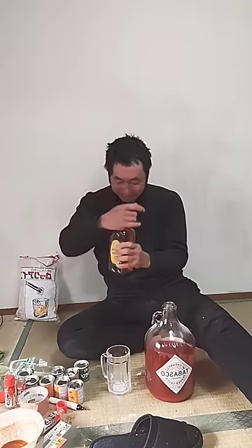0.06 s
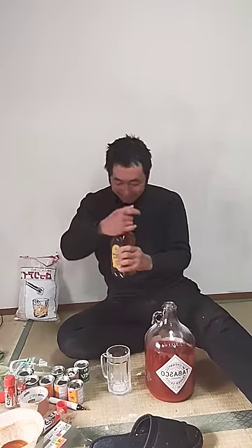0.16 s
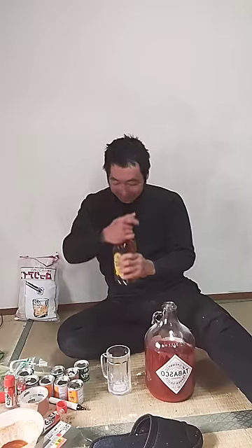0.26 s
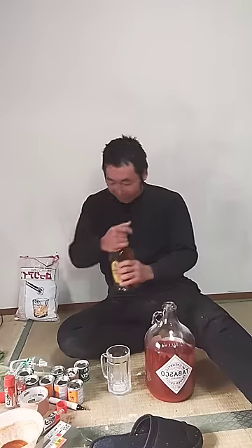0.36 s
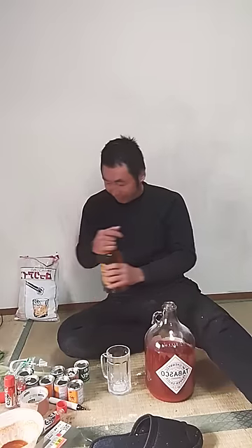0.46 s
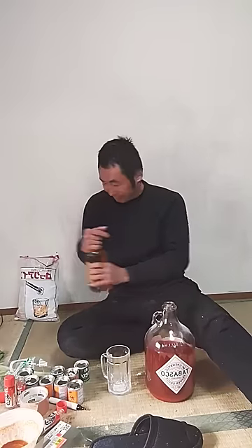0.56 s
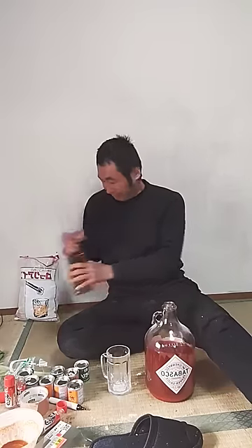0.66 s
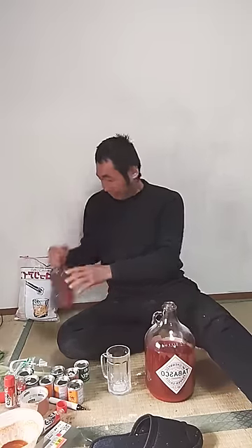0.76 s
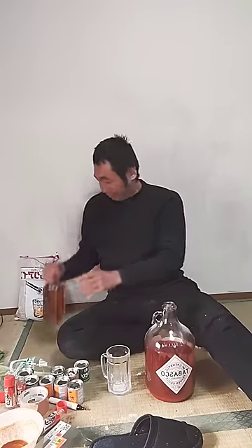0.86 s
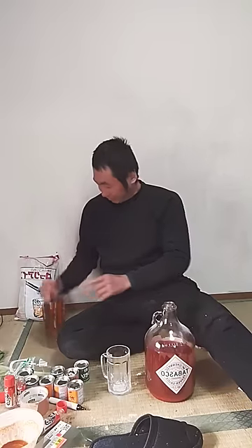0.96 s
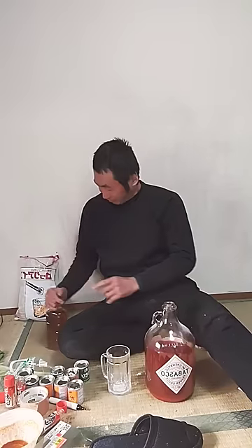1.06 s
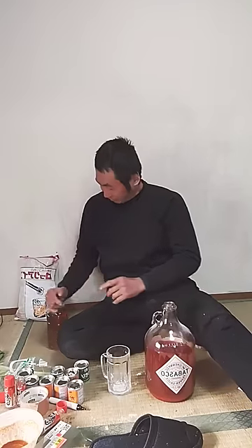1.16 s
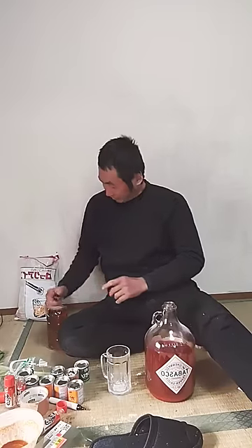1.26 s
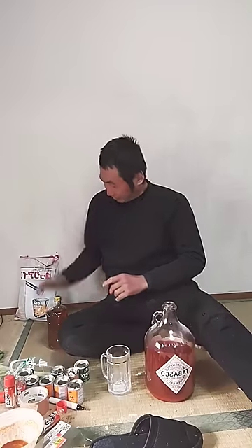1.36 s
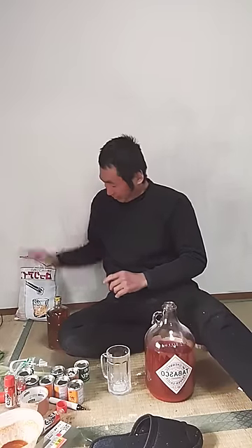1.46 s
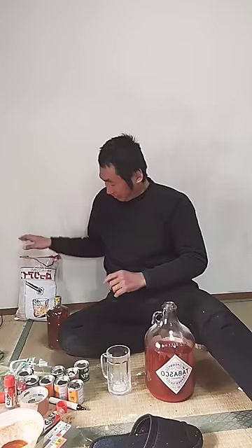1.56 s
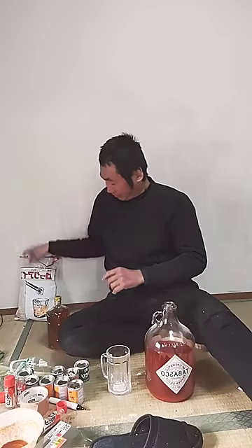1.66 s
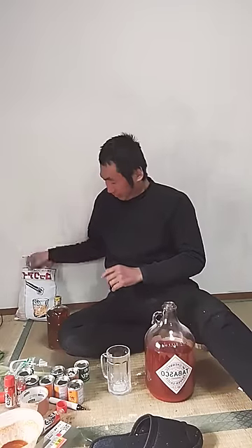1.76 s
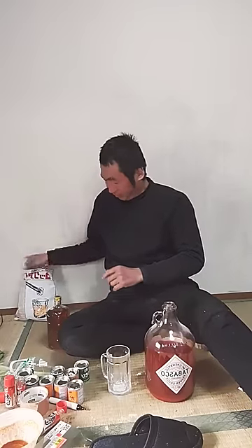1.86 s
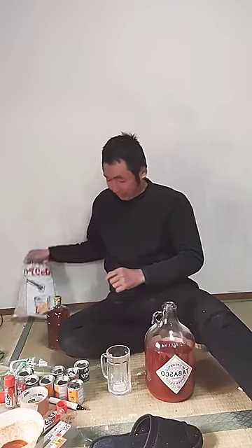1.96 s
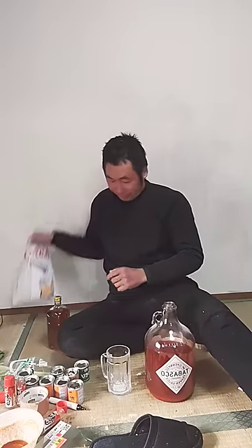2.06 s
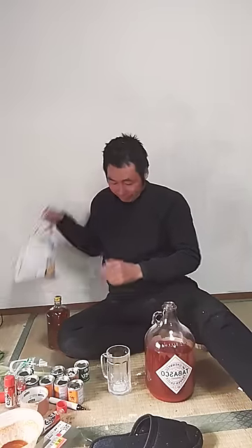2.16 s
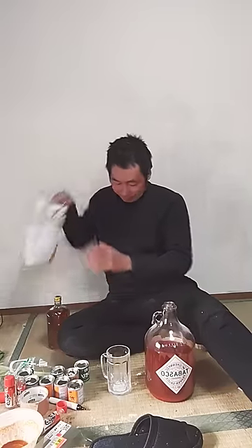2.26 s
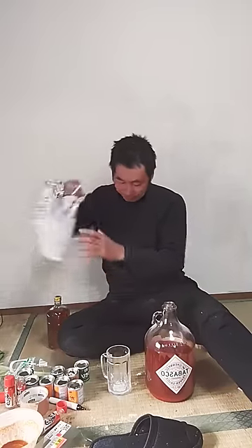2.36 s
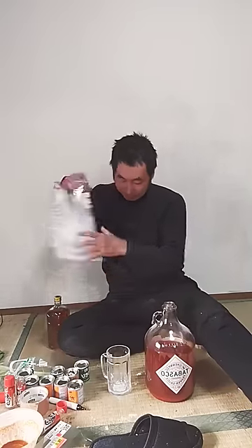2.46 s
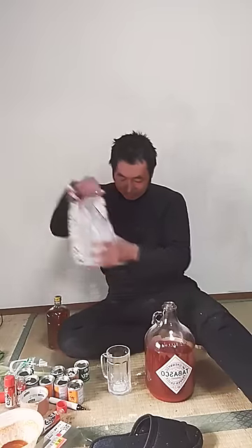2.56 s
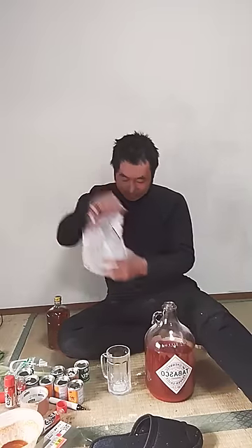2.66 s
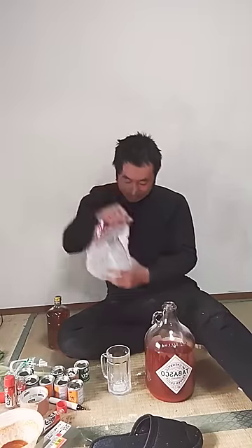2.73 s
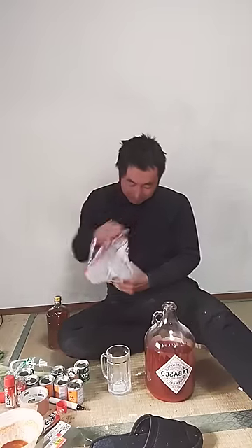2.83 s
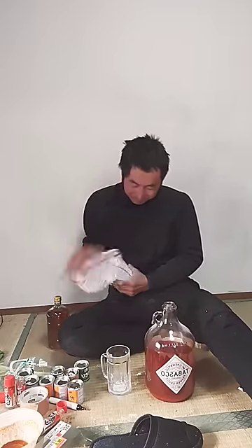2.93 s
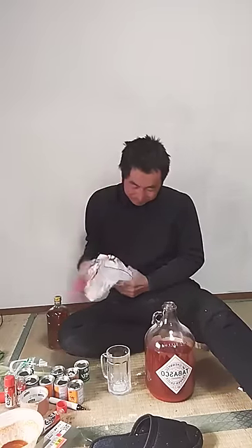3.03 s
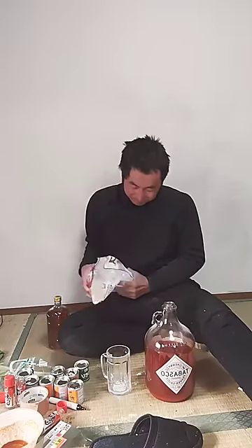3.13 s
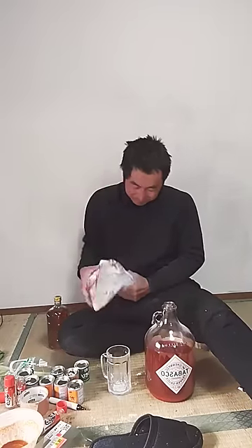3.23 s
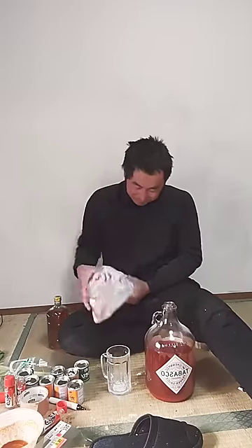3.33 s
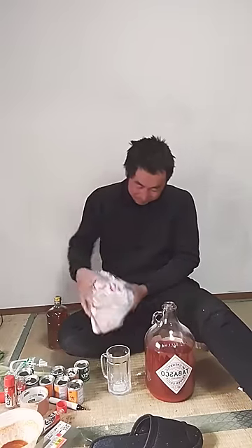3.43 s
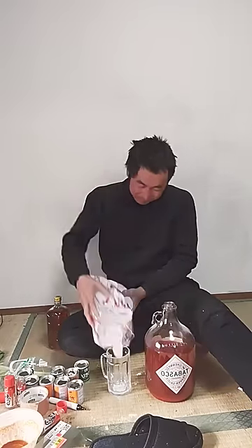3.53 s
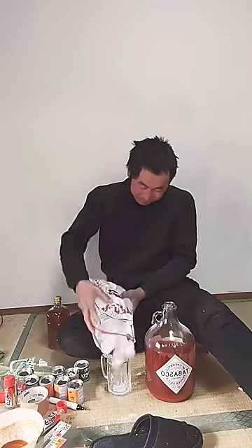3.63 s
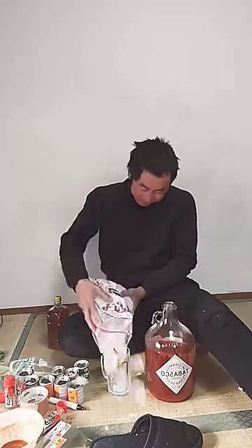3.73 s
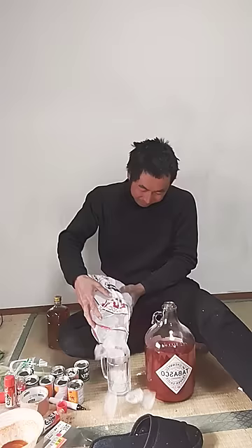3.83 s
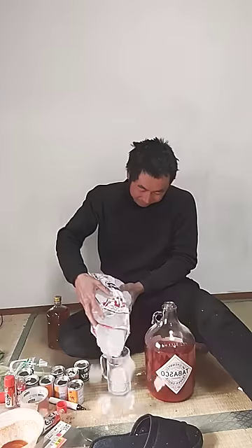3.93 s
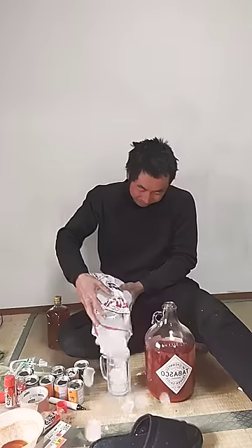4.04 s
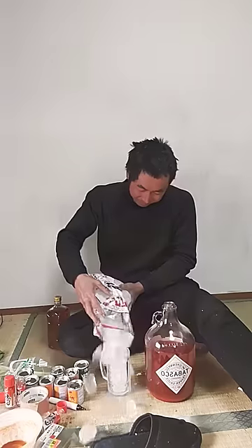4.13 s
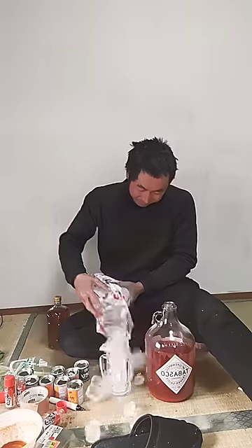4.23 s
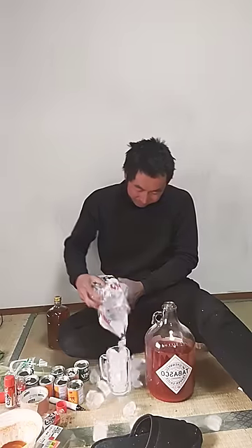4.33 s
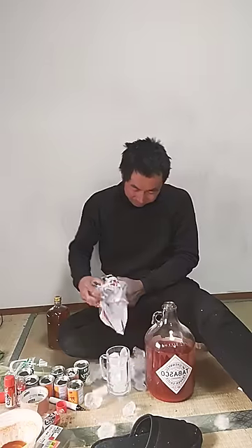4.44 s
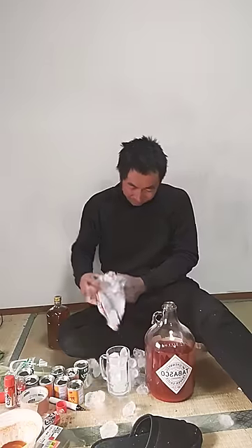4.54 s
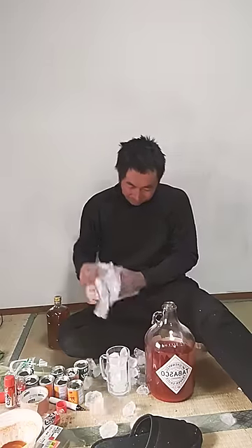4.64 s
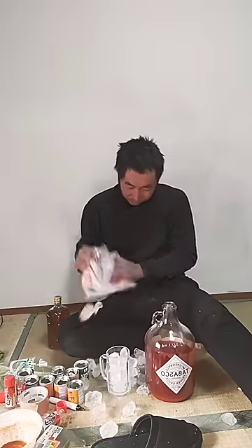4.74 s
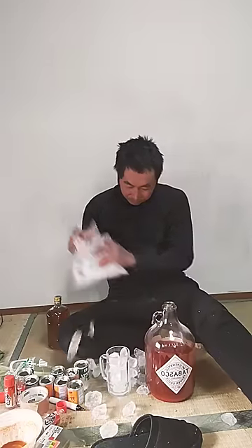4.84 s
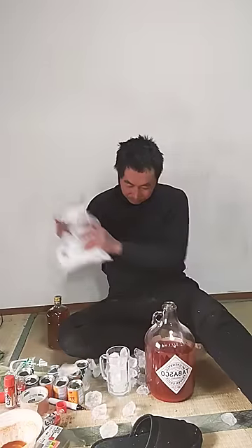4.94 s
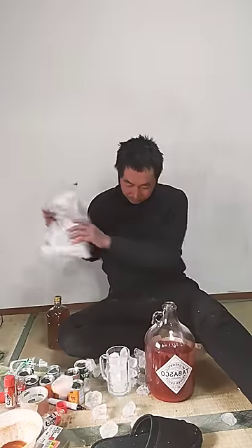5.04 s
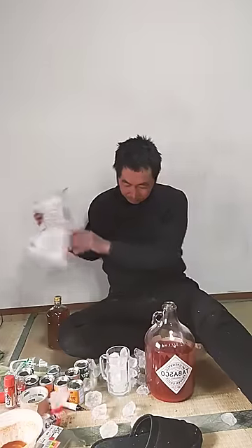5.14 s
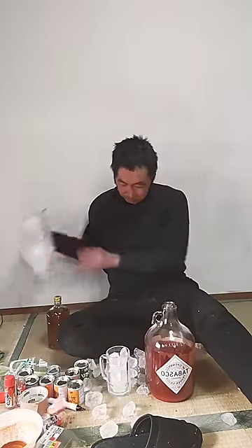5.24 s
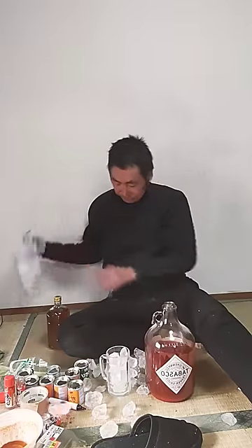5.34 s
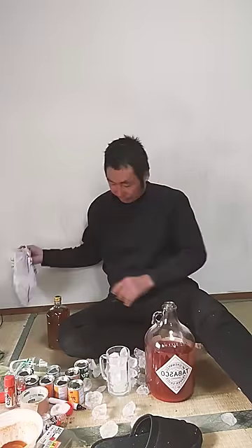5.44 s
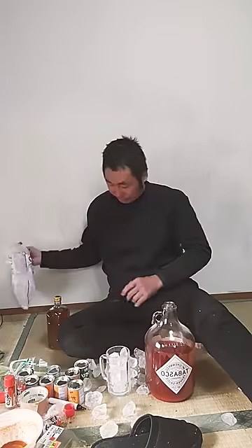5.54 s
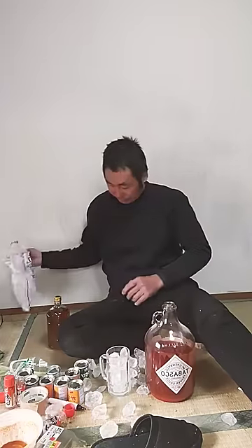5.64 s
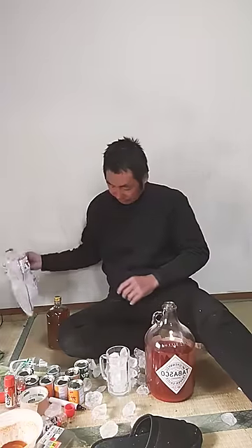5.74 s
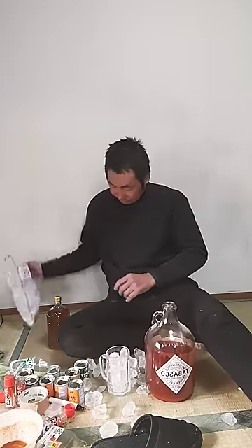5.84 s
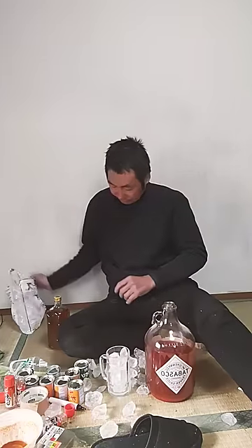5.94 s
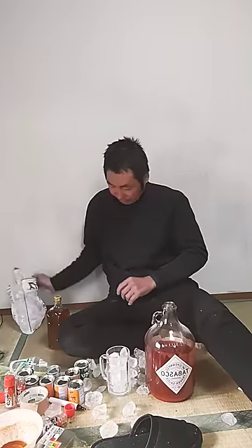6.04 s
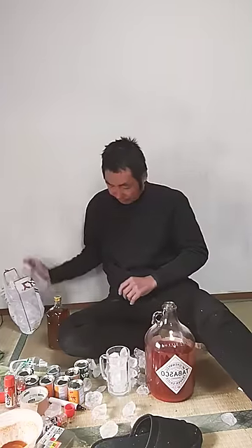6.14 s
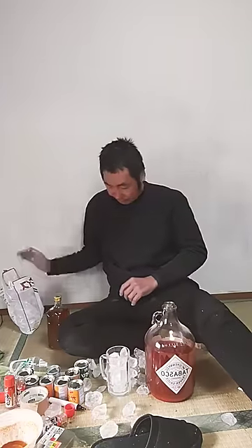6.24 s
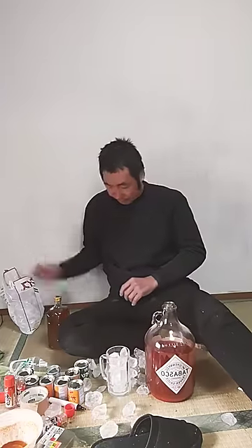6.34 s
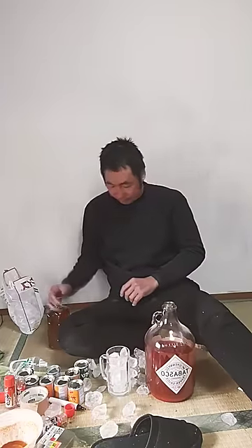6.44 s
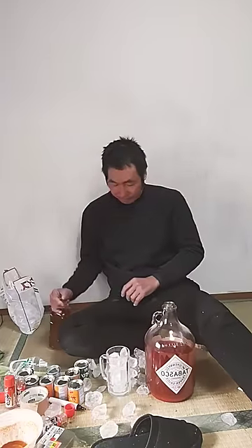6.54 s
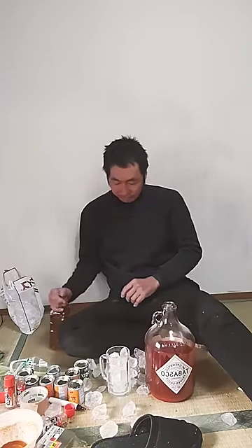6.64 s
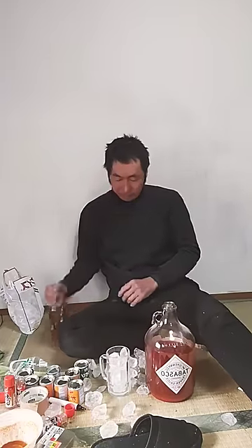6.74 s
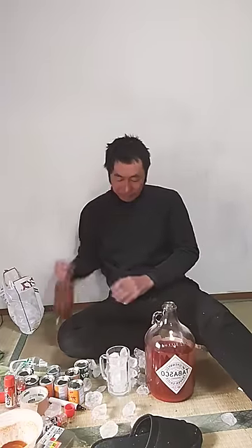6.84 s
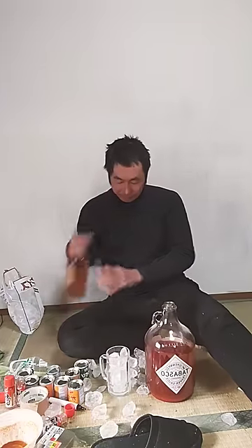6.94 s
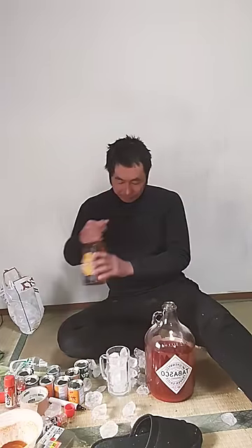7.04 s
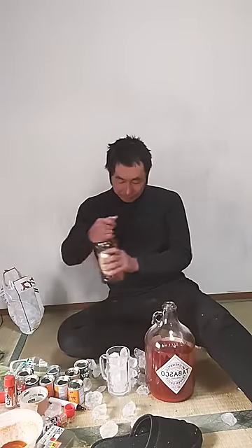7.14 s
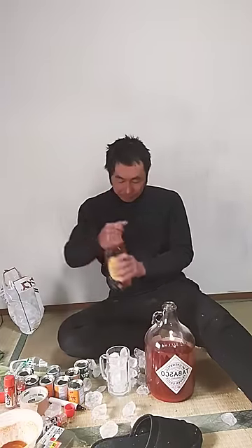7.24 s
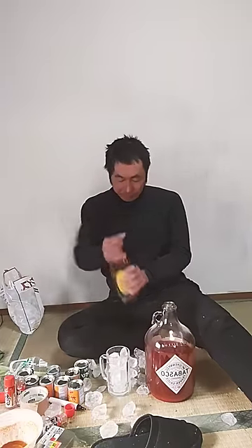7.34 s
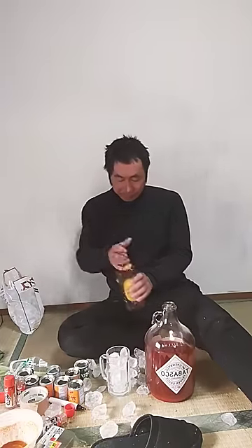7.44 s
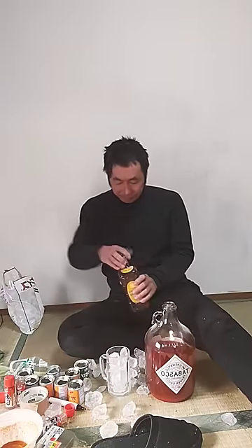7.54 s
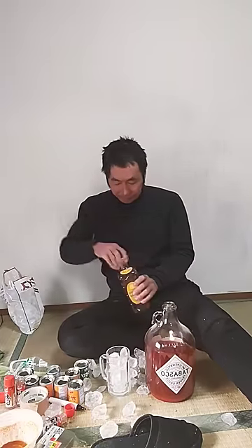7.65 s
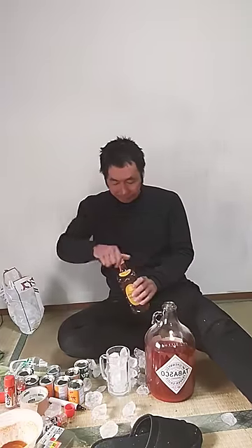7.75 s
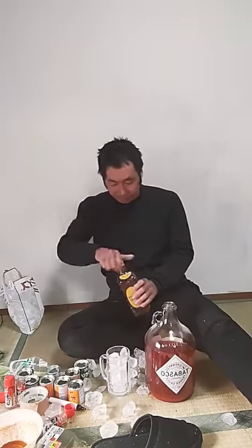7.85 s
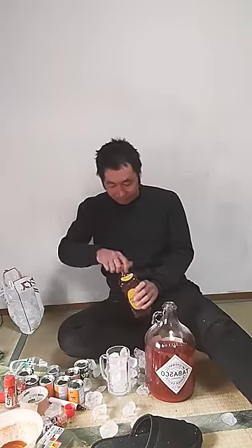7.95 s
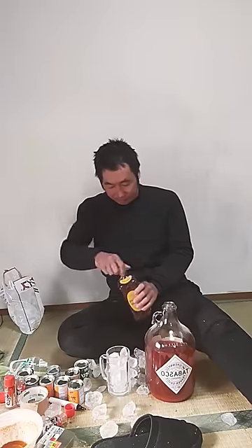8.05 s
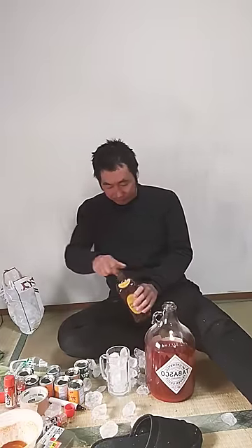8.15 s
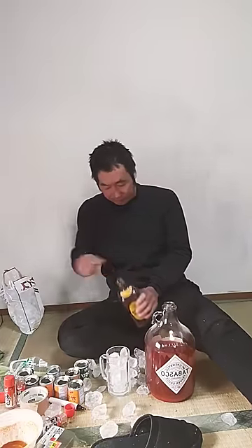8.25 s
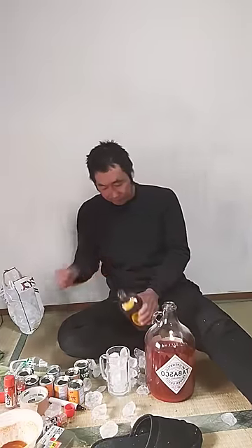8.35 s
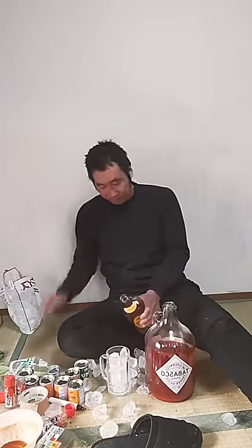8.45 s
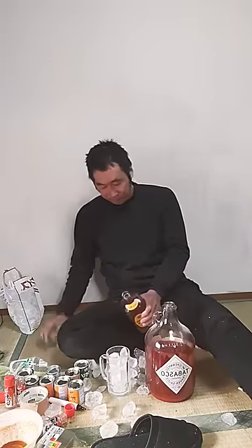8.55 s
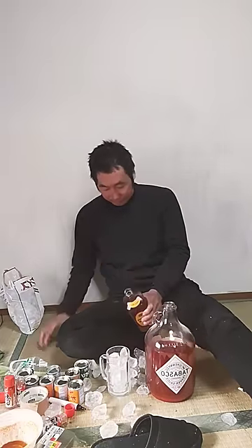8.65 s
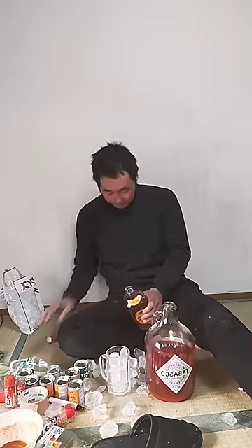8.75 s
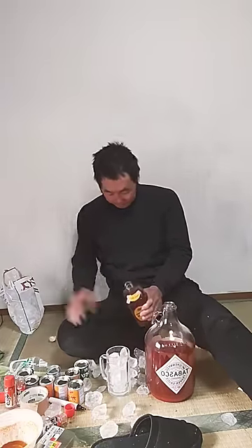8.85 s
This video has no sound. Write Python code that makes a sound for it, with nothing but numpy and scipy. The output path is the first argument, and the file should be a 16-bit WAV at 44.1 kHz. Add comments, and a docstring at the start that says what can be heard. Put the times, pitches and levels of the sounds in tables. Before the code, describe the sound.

Heavy bottle thud, crackling plastic, then a bright cascade of ice into a glass mug, loose cubes knocking, a bag drop and faint cap clicks.

```python
"""Ice cubes pour from a plastic bag, clink in a glass mug, strike a jug and thud on the mat of a small room.
Glass, ice, bottle, cap and other small hard things are banks of decaying modes with noise bursts at contact.
A bottle is set down first; the bag rustles as filtered clicks; at the end the bottle is opened, its cap dropped.
Thuds are damped sine cycles that set floor modes ringing; slow low rumble and a faint hiss swell and sink."""
import sys
import numpy as np
from scipy import signal
from scipy.fft import rfft, irfft
from scipy.io import wavfile
from scipy.ndimage import uniform_filter1d

SR = 44100
rng = np.random.default_rng(int(sys.argv[2]) if len(sys.argv) > 2 else 0)


def transcribe(signal):
    """Save signal, clipped to [-1, 1], as a 16-bit WAV file at the path in sys.argv[1]."""
    frames = np.atleast_2d(signal).T
    limited = np.clip(frames, -1, 1)
    pcm = np.round(limited * 32767).astype(np.int16)
    wavfile.write(sys.argv[1], SR, pcm)


def invert_db(x):
    """Field ratio 10**(x/20) for x, a level in decibels (scalar or array-like)."""
    u = np.asarray(x, float) / 20
    return 10 ** u


N = 392049
T = np.arange(N) / SR

# Swells of the background hiss and low rumble. Each row: peak in seconds, hiss level in dB,
# rise over 20 dB in seconds, fall over 20 dB in seconds (both at least 5 ms), relative rumble level in dB.
BACKGROUND_SWELLS = [(0.0, -68.5, 0, 0.43, -68.5), (0.31, -63.5, 0, 0.14, -52), (0.64, -69, 0, 0.6, -54),
                     (0.69, -61.5, 0, 0.14, -59), (0.93, -69, 0.26, 0.5, -54), (1.1, -78, 0, -2, -62),
                     (6.36, -68, 0, .5, -57), (6.558, -62.5, 0.34, 0, -46.5), (6.78, -63, 0.4, 0.74, -46.5),
                     (7.461, -52.5, 0.11, 0.2, -41.5), (7.54, -65.5, 0, 0.9, -49.5),
                     (8.105, -65, 0, 0.5, -54.5), (8.4, -68, 0.5, 0, -52), (8.88, -65.5, 0.92, 0.4, -48)]
# How thickly the ice pours. Each row: time in seconds, share of full flow.
POUR = [(3.55, 0.31), (3.8, 0.3), (4.2, 0.44), (4.42, 0.1), (4.5, 0.11)]


def colour(x, points):
    """Shape a signal by (Hz, dB) points; rms 1."""
    hz, db = np.transpose(points)
    f = np.maximum(np.fft.rfftfreq(len(x), 1 / SR), 1)
    gain = invert_db(np.interp(np.log(f), np.log(hz), db))
    y = irfft(rfft(x) * gain, len(x))
    return y / np.std(y)


def band(x, lo_hz, hi_hz, order=2):
    """Butterworth band-pass."""
    sos = signal.butter(order, [lo_hz, hi_hz], "band", fs=SR, output="sos")
    return signal.sosfilt(sos, x)


def curve(rows, column):
    """Gain of a dB column over time, silent outside its rows."""
    rows = np.array(rows)
    return invert_db(np.interp(T, rows[:, 0], rows[:, column], -200, -200))


def swells(rows, column):
    """Each swell climbs to its peak and dies away, straight in dB; powers add."""
    power = np.zeros(N)
    for row in rows:
        late_s = T - row[0]
        rise_s, fall_s = max(row[2], 0.005), max(row[3], 0.005)
        drop_db = 20 * np.where(late_s < 0, -late_s / rise_s, late_s / fall_s)
        power += invert_db(2 * (row[column] - drop_db))
    return np.sqrt(power)


def wander(rate_hz):
    """Random levels held for 1 / rate_hz seconds and slewed; spread near 1."""
    k = int(SR / rate_hz)
    held = rng.standard_normal(N // k + 1).repeat(k)[:N]
    return 1.44 * uniform_filter1d(held, k)


def clicks(rate_hz, spread_db):
    """Random clicks, many small and a few large; rms 1."""
    when = rng.random(N) < rate_hz / SR
    size = rng.standard_normal(N) * invert_db(spread_db * np.minimum(rng.exponential(size=N), 4))
    x = when * size
    return x / np.std(x)


def pour_flow():
    """Share of full ice flow over time, zero outside the pour."""
    return np.interp(T, *np.transpose(POUR), 0, 0)


def ring(modes, drive, flutter_db=0.):
    """Each decaying mode rings with its own row of drive; whatever touches the wall makes it flutter."""
    out = np.zeros(N)
    for (hz, db, t60_s), x in zip(modes, drive):
        pole = np.exp(2j * np.pi * hz / SR - np.log(1000) / (t60_s * SR))
        level = invert_db(db + flutter_db * wander(150))
        out += level * signal.lfilter([1], [1, -pole], x).imag
    return out


def struck(modes, hits, fall_db):
    """Each blow drives the mode nearest the struck spot by its lead; the others fade with distance in octaves."""
    hz = np.array(modes)[:, 0]
    drive = np.zeros((len(hz), N))
    chance_db = 3 * rng.standard_normal((len(hits), len(hz)))
    for (s, db, spot_hz, lead_db), scatter_db in zip(hits, chance_db):
        octaves = np.abs(np.log2(hz / spot_hz))
        share_db = np.where(octaves == octaves.min(), lead_db, scatter_db - fall_db * octaves)
        drive[:, int(s * SR)] += invert_db(db + share_db)
    return drive


def cracks(hits, decay_ms, lo_hz, hi_hz, order=1):
    """The contact itself: a sharp click and a short burst of noise, new for every blow."""
    out = np.zeros(N)
    t = np.arange(SR // 12) / SR
    for s, db, *_ in hits:
        burst = 0.72 * rng.standard_normal(len(t)) * np.exp(-t / (decay_ms / 1000)) * np.tanh(t / 0.00095)
        burst[0] = 0.3  # the click
        out[int(s * SR):][:len(t)] += invert_db(db) * burst
    return band(out, lo_hz, hi_hz, order=order)


def cube_rings(hits, t60_s, lo_hz, count):
    """Every cube has its own shape, so each blow adds a cluster of short rings at pitches of its own."""
    out = np.zeros(N)
    t = np.arange(SR // 8)[:, None] / SR
    for (s, db, *_), (where, size) in zip(hits, rng.random((len(hits), 2, count))):
        hz = lo_hz * (15000 / lo_hz) ** where
        rings = invert_db(-12 * size - 60 * t / t60_s) * np.sin(2 * np.pi * hz * t)
        out[int(s * SR):][:len(t)] += invert_db(db) * rings.sum(axis=1)
    return out


def hiss():
    """Smooth faint hiss over a steady floor, swelling and sinking."""
    # Spectrum of the hiss. Each row: frequency in Hz, relative density in dB per Hz.
    hiss_shape = [(180, -10.5), (300, -4.5), (1180, -8), (2400, -5), (5300, -5.5), (7500, -4),
                  (15500, -8.5)]
    steady_db = -92
    level = swells(BACKGROUND_SWELLS, column=1) + invert_db(steady_db)
    return level * colour(rng.standard_normal(N), hiss_shape)


def rumble():
    """Slow low rumble that swells and sinks, partly along with the hiss."""
    # Broad course of the rumble. Each row: time in seconds, relative level in dB.
    rumble_levels = [(1.03, -52), (1.06, -37), (1.62, -36), (2.507, -54), (3.512, -46.5), (3.629, -38.5),
                     (4.824, -54.5), (4.954, -46), (5.732, -44.5), (5.844, -51), (5.984, -38.5),
                     (6.213, -42.5), (6.34, -67)]
    shape = [(2, -11.5), (7, -7.5), (20, -19.5), (45, -29.5), (100, -41.5), (400, -72.0)]  # Hz, dB
    slow = colour(rng.standard_normal(N), shape)
    level = np.hypot(curve(rumble_levels, 1), swells(BACKGROUND_SWELLS, column=4))
    return invert_db(3.0) * slow * uniform_filter1d(level, size=SR // 25)  # level changes smoothed over 40 ms


def thuds():
    """Damped cycle or two from the mat, its straw crunching; the push sets the floor boards ringing."""
    # Landings on the mat. Each row: start in seconds, relative level in dB, thud frequency in Hz,
    # floor push over the thud in dB.
    landings = [(1.035, -14, 125, -1), (1.058, -23.5, 90.5, 8.5), (1.072, -22, 87, 2.5),
                (1.515, -40.5, 132, 0), (1.923, -32, 195, -21), (2.922, -34.5, 125, -7),
                (3.599, -31, 121, -5.5), (3.665, -23, 260, -15), (3.787, -18.5, 328, -15.5),
                (3.853, -18, 356, -17.5), (3.868, -17, 180, -15), (3.999, -15.5, 208, -15),
                (4.048, -22.5, 354, -14.5), (4.154, -19, 188, -13), (4.274, -22.5, 198, -16.5),
                (4.3, -18, 236, -15.5), (4.473, -23, 199, -10), (4.969, -24.5, 233, -11),
                (5.022, -29, 167, -16), (5.198, -29.5, 210, -15), (5.525, -33.5, 162, -9),
                (5.915, -19, 158, -3.5), (6.989, -56, 334, -24.5), (8.617, -50, 162, 5.5),
                (8.649, -44, 300, -22)]
    # Modes of the floor boards. Each row: frequency in Hz, relative level in dB, T60 in seconds.
    floor_modes = [(22.3, -14.5, 0.94), (42.6, -5.5, 0.6), (58, -10, 0.38), (74.7, -3.5, 0.49),
                   (99.3, -3, 0.53), (188, -19.5, 0.16)]
    mat, push = np.zeros(N), np.zeros(N)
    t = np.arange(SR // 10) / SR
    for s, db, hz, floor_db in landings:
        i = int(s * SR)
        cycles = t * hz
        envelope = 3.2 * cycles * np.exp(-cycles / 0.58)
        mat[i:i + len(t)] -= invert_db(db) * np.sin(2 * np.pi * cycles) * envelope
        push[i] -= invert_db(db + floor_db)
    boards = ring(floor_modes, [push] * len(floor_modes))
    straw = invert_db(-11.5) * cracks(landings, 18.0, 400, 4500)
    return mat, boards, straw


def bottle():
    """Blows ring the bottle's modes, each with a contact burst."""
    # Modes of the bottle. Each row: frequency in Hz, relative level in dB, T60 in seconds.
    bottle_modes = [(903, -7.5, 0.41), (2200, -1, 0.15), (2490, -1.5, 0.19), (3660, -4, 0.13),
                    (3900, 1, 0.098)]
    # Blows. Each row: start in seconds, relative level in dB, struck spot in Hz, lead of its mode in dB.
    bottle_hits = [(1.394, -58, 3660, 4.1), (7.316, -76, 3900, 13.5), (7.5, -69.5, 2190, 10.2),
                   (8.0955, -65, 3660, 2), (8.1294, -70, 2200, 9.3)]
    body = ring(bottle_modes, struck(bottle_modes, bottle_hits, fall_db=1.5), flutter_db=5.5)
    return invert_db(-2.0) * body + cracks(bottle_hits, 6.0, 900, 9000)


def bag():
    """Creases of thin plastic pop open densely and in clusters; the cubes inside knock dully."""
    # Broad rise and fall of the rustle. Each row: time in seconds, level in dB.
    rustle_levels = [(1.6, -73), (1.69, -67.5), (1.74, -52), (2.08, -52.5), (2.46, -44.5), (2.7, -34.5),
                     (3.07, -42.5), (3.33, -36), (3.42, -32.5), (3.72, -37), (3.85, -31), (4.42, -35.5),
                     (4.55, -43), (4.9, -46), (5.25, -41.5), (5.88, -42.5), (6.22, -52), (6.29, -115)]
    # Spectrum of the crinkle. Each row: frequency in Hz, relative density in dB per Hz.
    crinkle_shape = [(590, -22), (1000, -7), (1240, -1.5), (4650, 3.5), (5520, -2), (7030, 4.5),
                     (9150, -1.5), (14800, 2), (15500, -0.5)]
    # Single squeezes, tugs and drops. Each row: peak in seconds, level in dB, rise over 20 dB in seconds,
    # fall over 20 dB in seconds (both at least 5 ms).
    squeezes = [(1.93, -28, 0.1232, 0.15), (2.19, -40, 0.13, 0), (2.362, -43, 0, 0.4),
                (2.518, -24.5, 0.0281, 0.44), (2.82, -27, 0.0963, 0.42), (2.998, -26, 0.2535, 0.15),
                (3.3, -37.5, 0.1, 0.55), (3.562, -27, 0.2731, 0), (4.168, -24, 0.38, 0.19),
                (4.313, -22.5, 0.17, 0.2137), (4.487, -29.5, 0, 0.1863), (4.687, -34.5, 0.3, 0.09),
                (5.14, -34, 0.6, 0.2453), (5.413, -32.5, 0.36, 0.09), (5.928, -17, 0.0383, 0.1022),
                (6.126, -36, 0, 0.11)]
    # How loosely the ice lies. Each row: time in seconds, knocking level against the crinkle in dB.
    loose_ice = [(1.6, 4), (1.95, -13), (2.55, -16), (4.3, -22.5), (4.9, -12), (5.7, -13), (6.2, -12.5)]
    # Snaps of the creases. Each row: start in seconds, relative level in dB.
    snaps = [(1.8173, -17), (1.8796, -11.5), (1.9121, -19), (2.1395, -26.5), (2.2752, -13), (2.3565, -17.5),
             (2.5037, -7), (2.6509, -16), (2.8858, -9.5), (2.974, -9), (3.001, -11.5), (3.0859, -12.5),
             (3.3593, -11.5), (4.4864, -13.5), (4.5421, -18), (4.563, -13.5), (5.0828, -15.5), (5.121, -20),
             (5.2599, -15), (5.5478, -16.5), (5.6077, -19), (5.838, -24.5), (6.123, -11), (6.355, -41), ]
    pops = invert_db(1.5 * wander(70)) * clicks(7000, 1.9) + 0.45 * clicks(220, 2.0)
    film = colour(pops, crinkle_shape)
    dull = band(film, 300, 7400)
    bright = film - dull
    film = invert_db(1.3 * wander(25)) * dull + invert_db(1.3 * wander(25)) * bright  # each wavers by itself
    cubes = band(clicks(900, 3.0), 90, 1300)
    cubes /= np.std(cubes)
    handling = np.hypot(curve(rustle_levels, 1), swells(squeezes, column=1))
    rustle = handling * (film + curve(loose_ice, 1) * cubes)
    return rustle + invert_db(0.76) * cracks(snaps, 1.78, 2800, 18000)


def ice():
    """Struck cubes ring briefly at shared modes and at pitches of their own, with a bright crack."""
    # Modes of the ice. Each row: frequency in Hz, relative level in dB, T60 in seconds.
    ice_modes = [(760, -15, .06), (1001, -13.5, 0.1), (1400, -17, .05), (1600, -18.5, 0.067),
                 (2300, -11.5, 0.025), (4150, -13, .03), (4985, -13, 0.065), (5410, -12.5, .03),
                 (6584, -13.5, 0.07), (7150, -14, 0.08), (9400, -13, 0.032), (11000, -12, 0.11)]
    # Blows. Each row: start in seconds, relative level in dB, struck spot in Hz, lead of its mode in dB.
    ice_hits = [(2.195, -42.5, 1001, 13), (2.527, -36, 760, 20), (3.735, -22.5, 1600, 18.3),
                (3.761, -30, 1600, 16), (3.8, -30.5, 1600, 15), (4.036, -26, 1400, 17),
                (4.913, -5, 5410, 6), (4.918, -6.5, 4985, 7), (5.018, -14.5, 7150, 5),
                (5.019, -22, 1600, 17), (5.049, -28, 6584, 19), (5.020, -26, 1001, 17),
                (5.127, -19, 2300, 14), (5.345, -32, 1001, 19), (5.703, -36.5, 4985, 18)]
    body = ring(ice_modes, struck(ice_modes, ice_hits, fall_db=8.0), flutter_db=5.5)
    contact = cracks(ice_hits, 9.4, 5000, 19845)
    cubes = cube_rings(ice_hits, 0.13, 4000, count=24)
    return invert_db(-3.5) * body + invert_db(2.5) * contact + invert_db(-16) * cubes


def knocks():
    """Dull knocks of cube on cube: short noise bursts."""
    # Knocks. Each row: start in seconds, relative level in dB.
    knock_hits = [(2.921, -13), (3.664, -17.5), (3.700, -17.5), (4.101, -14), (4.221, -14), (4.916, -7),
                  (4.968, -14.5), (5.049, -17), (5.200, -16.5)]
    return cracks(knock_hits, 2.5, 980, 4000, order=2)


def mug():
    """Single blows, and while the ice pours a rattle of small cubes, ring the mug's modes."""
    # Mode frequencies of the mug in Hz.
    mug_hz = [605, 2222, 2346, 3170, 3271, 4120, 4639, 5715, 6292, 6612, 6906, 7545, 9128, 10390, 11118,
              11925, 13070, 14085, 14680]
    # The modes in that order. Each row: relative level in dB, T60 in seconds.
    mug_ring = [(-17.5, .061), (-14.5, 0.37), (-6.5, .15), (-18, .15), (-14, 0.16), (-21, 0.076),
                (-14.5, 0.11), (-15, .13), (-12, 0.091), (-10.5, .1), (-12, 0.14), (-15, 0.19), (-9, 0.072),
                (-17.5, 0.092), (-14.5, 0.15), (-17, .1), (-14, 0.12), (-18, .09), (-12, 0.097)]
    # Blows. Each row: start in seconds, relative level in dB, struck spot in Hz, lead of its mode in dB.
    mug_hits = [(3.5561, -2, 9110, 7), (3.558, -11, 2345, 12), (3.6404, -19.5, 6230, 9),
                (3.7, -22, 2343, 11), (3.7333, -13, 14640, 9), (3.735, -18, 603.5, 17.5),
                (3.7594, -15, 10420, 14.5), (3.7999, -7, 9150, 9), (3.82, -14.5, 6603, 12),
                (3.8709, -6.5, 3265, 5.5), (3.9388, -8.5, 3260, 9), (4.0206, -10, 2330, 4),
                (4.0856, -7, 4650, 17), (4.1044, -11, 2244, 10.5), (4.1454, -7, 11140, 9),
                (4.146, -15, 5726, 14.5), (4.164, -8, 6650, 9.5), (4.1723, -3.5, 6650, 14.5),
                (4.2207, -11.5, 2346, 8.5), (4.2494, -11.5, 6310, 7), (4.2794, -12.5, 6225, 13.5),
                (4.29, -10.5, 14650, 10.5), (4.3088, -9.5, 6320, 15.5), (4.366, -6.5, 6860, 16.5),
                (4.398, -18, 2217, 23.5), (4.4262, -3.5, 11118, 14)]
    full_s, full_db, wall_hz = 4.24, -8, 3400  # once full, modes below wall_hz are driven less
    modes = [(hz, *row) for hz, row in zip(mug_hz, mug_ring)]
    spots = invert_db(4.0 * rng.standard_normal((len(modes), N // 256 + 1))).repeat(256, axis=1)[:, :N]
    rattle = invert_db(-37.5) * pour_flow() * clicks(260, 1.1) * spots
    packed = np.outer(np.array(mug_hz) < wall_hz, T > full_s)  # ice wedged against the wall holds its low modes
    drive = invert_db(full_db * packed) * (struck(modes, mug_hits, fall_db=3.0) + rattle)
    body = ring(modes, drive, flutter_db=2.07)
    contact = cracks(mug_hits, 2.4, 2500, 16000, order=2)
    cubes = cube_rings(mug_hits, 0.05, 1200, count=14)
    return invert_db(-9.5) * body + invert_db(-13.5) * contact + invert_db(-30.5) * cubes


def tumble():
    """Many small cubes miss the mug and bump on the mat while the ice pours."""
    bumps = band(clicks(90, 3.8), 81, 520)
    return invert_db(-38.0) * np.sqrt(pour_flow()) * bumps / np.std(bumps)


def jug():
    """Cubes strike the jug and ring its modes."""
    # Modes of the jug. Each row: frequency in Hz, relative level in dB, T60 in seconds.
    jug_modes = [(1324, -14, 0.58), (1497, -15, 0.99), (1610, -12, 0.9), (3230, -12.5, 0.22),
                 (3408, -4.5, 0.42), (3507, -8, 0.35), (3640, -10.5, .25), (3880, -13, 0.18),
                 (5033, -6, 0.16)]
    # Blows. Each row: start in seconds, relative level in dB, struck spot in Hz, lead of its mode in dB.
    jug_hits = [(4.25, -18, 3507, 3.3), (4.288, -10.5, 5033, 5.6), (4.309, -9, 3408, 4.4),
                (4.311, -23, 1610, 5), (4.322, -16, 1324, 8)]
    return invert_db(-9.5) * ring(jug_modes, struck(jug_modes, jug_hits, fall_db=8.0), flutter_db=2.5)


def clacks():
    """Short ringing clacks and ticks of the cap and other small hard things: modes, dull and bright bursts."""
    # Modes of these things. Each row: frequency in Hz, relative level in dB, T60 in seconds.
    clack_modes = [(3180, -8, 0.037), (3480, -5.5, 0.03), (5300, -7, 0.043), (6067, -11, 0.055),
                   (10250, -12.5, 0.15), (12450, -9, 0.12), (14450, -10, 0.069)]
    # Clacks and ticks. Each row: start in seconds, relative level in dB, favoured frequency in Hz,
    # lead of its mode in dB.
    clack_hits = [(7.69, -59, 3550, 12), (7.911, -53, 5300, 12), (8.617, -44, 3180, 4),
                  (8.634, -48.5, 3550, 12.5), (8.647, -43, 6067, 12), (8.660, -53, 3180, 10.5),
                  (8.672, -54, 3480, 11), (8.727, -48.5, 10250, 14), (8.728, -49, 14450, 16),
                  (8.730, -55.5, 12450, 19), (8.798, -55, 14450, 0), (8.803, -53.5, 14450, 0)]
    body = ring(clack_modes, struck(clack_modes, clack_hits, fall_db=10.5), flutter_db=5.5)
    dull = cracks(clack_hits, 12, 200, 3500)
    bright = cracks(clack_hits, 1.5, 3000, 16000)
    return invert_db(-3.5) * body + invert_db(4.5) * dull + invert_db(3.0) * bright


def room(x):
    """Dense reflections of a small bare room, the treble fading faster."""
    t60_s, treble_t60_s, room_db = 0.47, 0.25, -7.5
    t = np.arange(SR // 2) / SR
    noise = rng.standard_normal(len(t))
    low = band(noise, 17, 2000)
    tail = low * invert_db(-60 * t / t60_s) + (noise - low) * invert_db(-60 * t / treble_t60_s)
    tail *= np.clip(t / 0.0013 - 1, 0, 1)  # nothing returns before the nearest wall
    tail /= np.sqrt(np.sum(tail ** 2))
    return x + invert_db(room_db) * signal.fftconvolve(x, tail)[:N]


def scene():
    """Everything airborne passes through the room; mat and floor also reach the microphone through its stand."""
    mat, boards, straw = thuds()
    struck_things = bottle() + ice() + knocks() + mug() + jug() + clacks()
    air = room(struck_things + bag() + invert_db(2.0) * mat + straw + tumble())
    stand = invert_db(-14.5) * mat + boards
    return (air + stand + rumble() + hiss())[None]


def roll_off(x):
    """The treble ends steeply here."""
    return signal.sosfilt(signal.butter(12, 15500, fs=SR, output="sos"), x)


def record(dry):
    """Peaks are clipped at full scale."""
    mix = np.clip(dry, -1, 1)
    return roll_off(mix)


dry = scene()
out = record(dry)
transcribe(out)
```